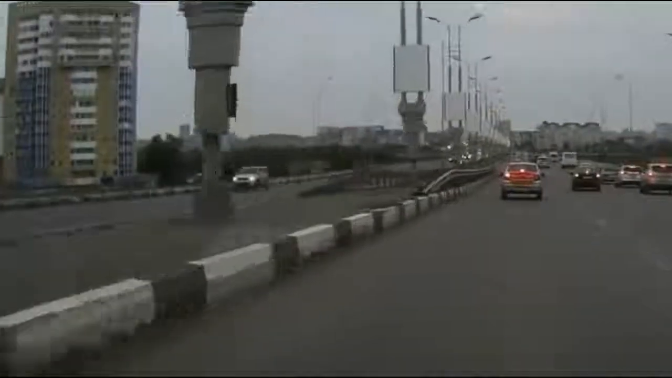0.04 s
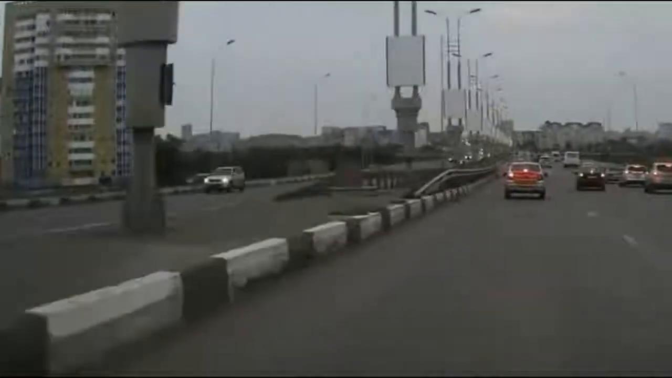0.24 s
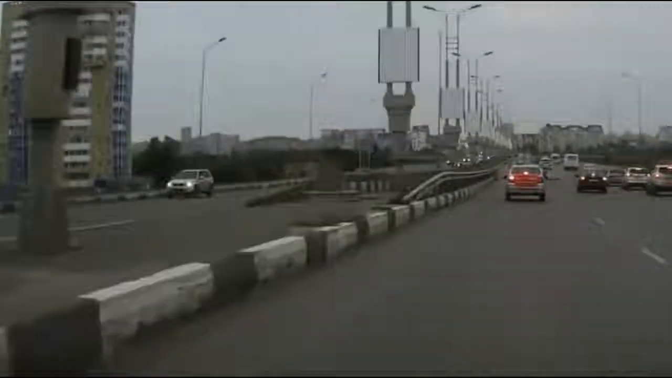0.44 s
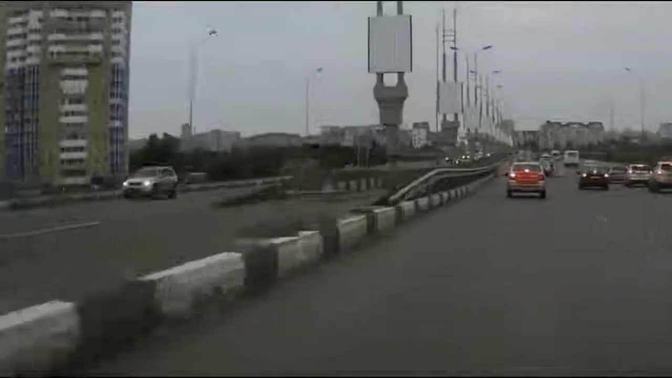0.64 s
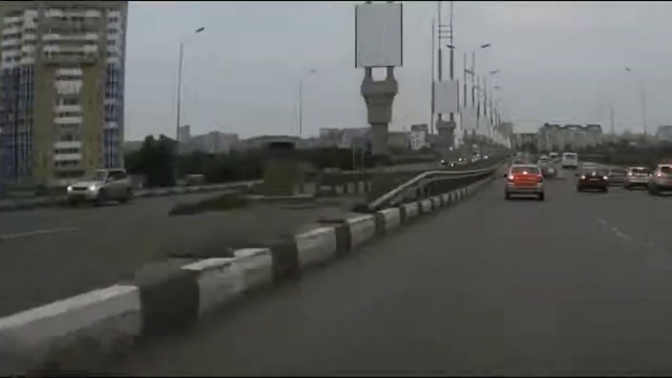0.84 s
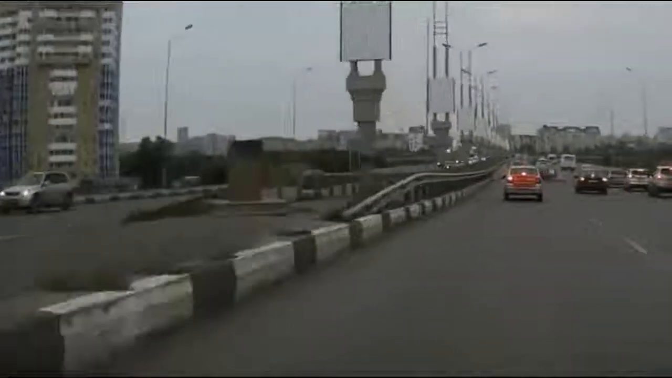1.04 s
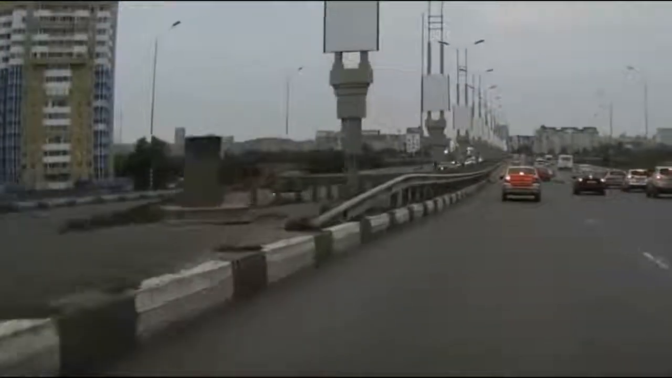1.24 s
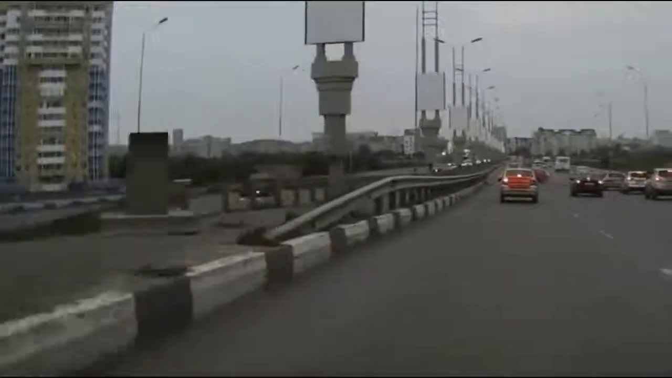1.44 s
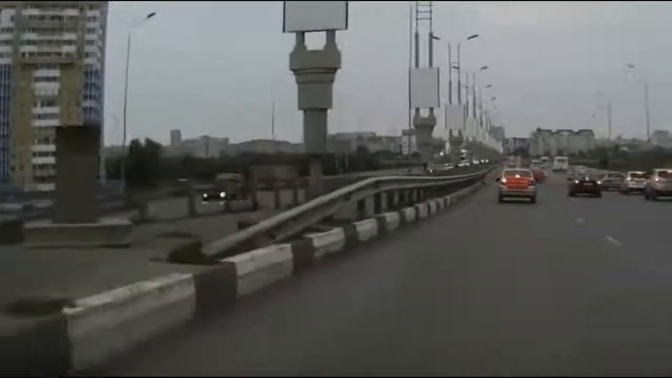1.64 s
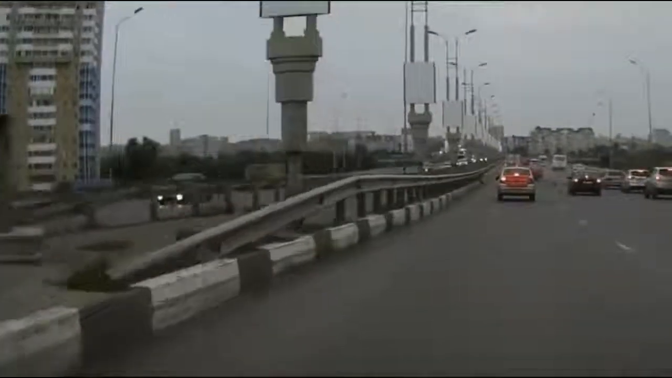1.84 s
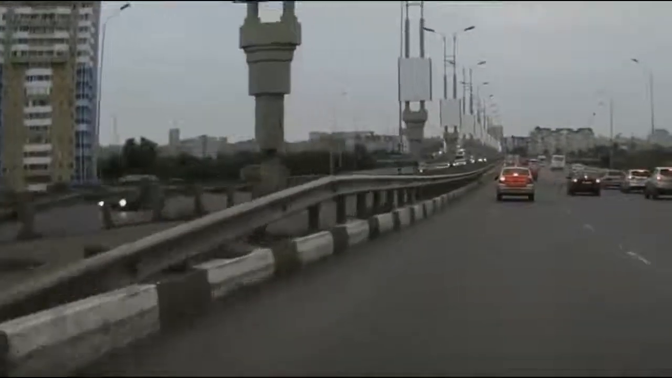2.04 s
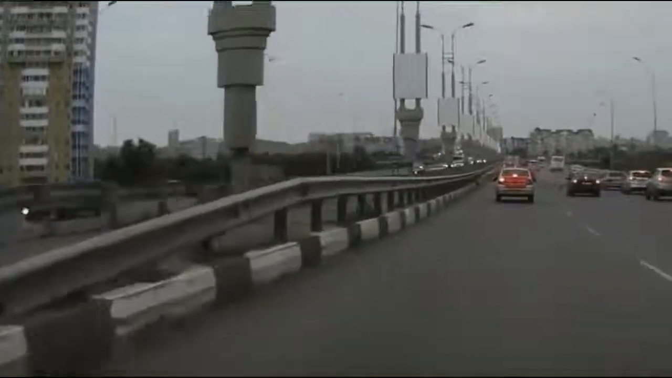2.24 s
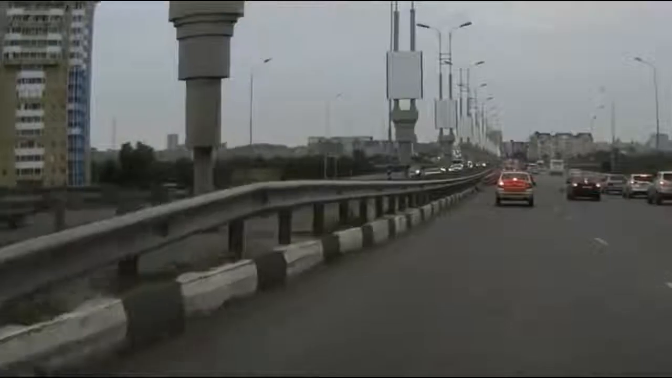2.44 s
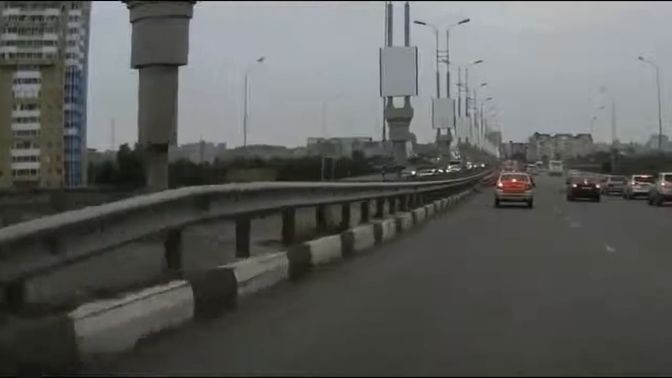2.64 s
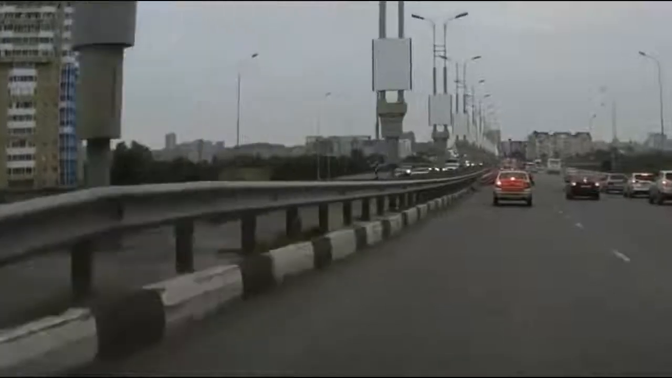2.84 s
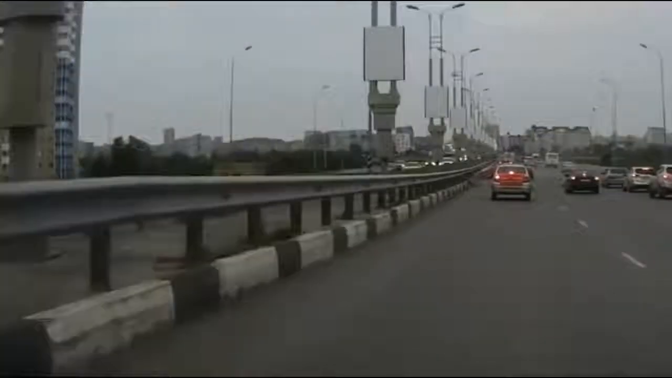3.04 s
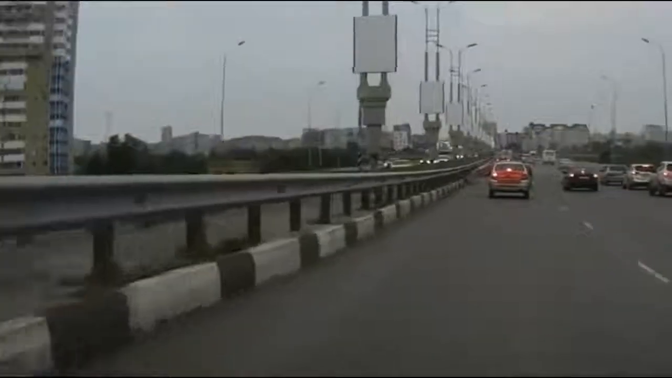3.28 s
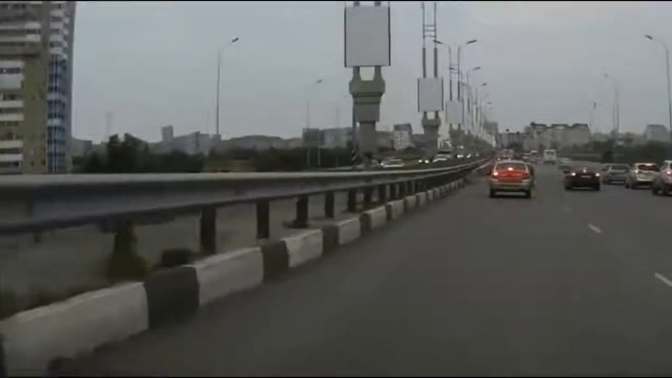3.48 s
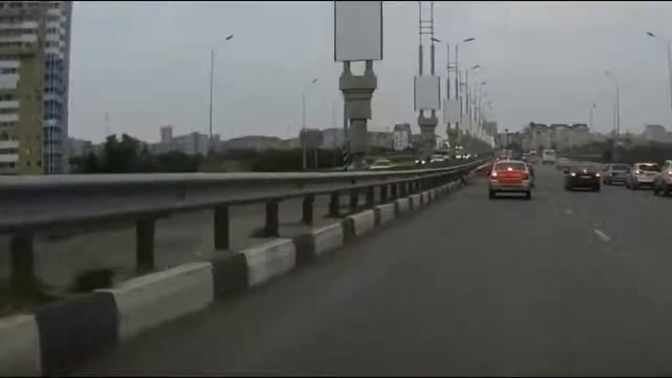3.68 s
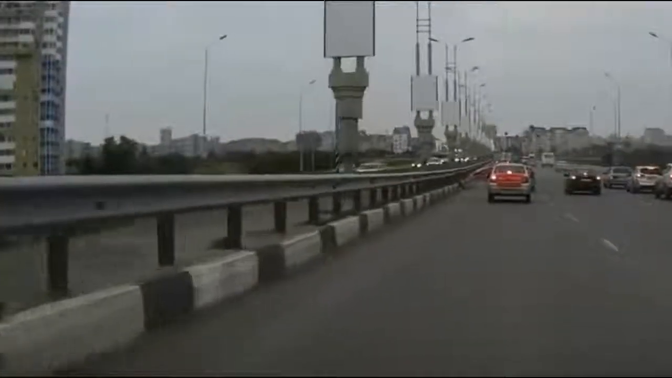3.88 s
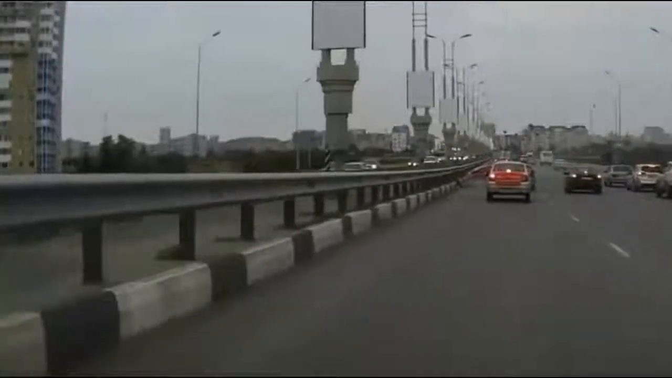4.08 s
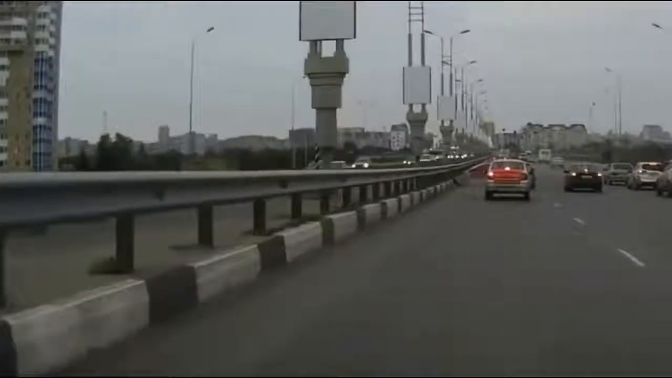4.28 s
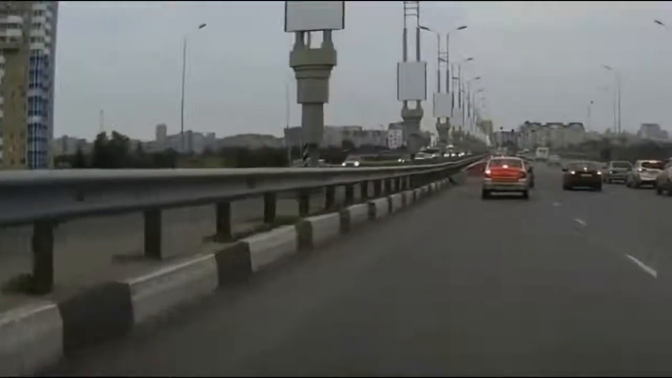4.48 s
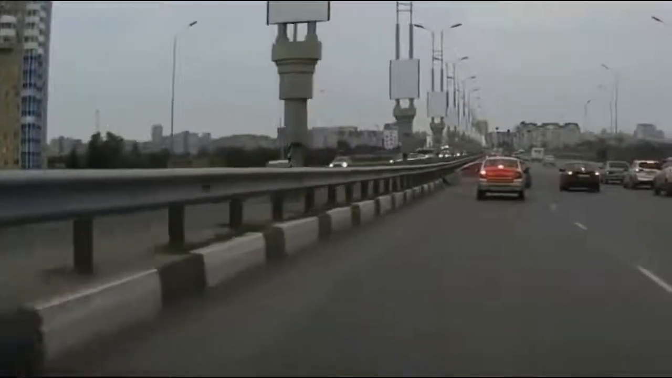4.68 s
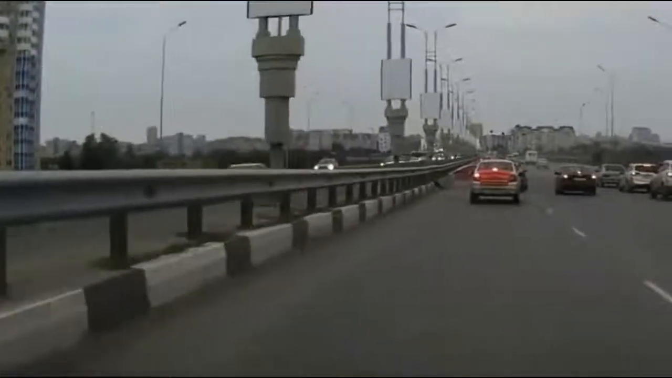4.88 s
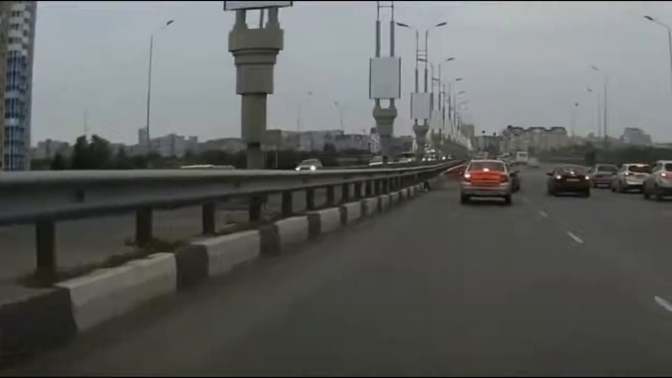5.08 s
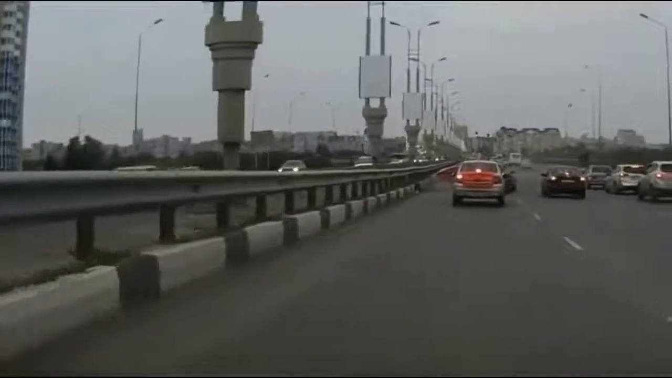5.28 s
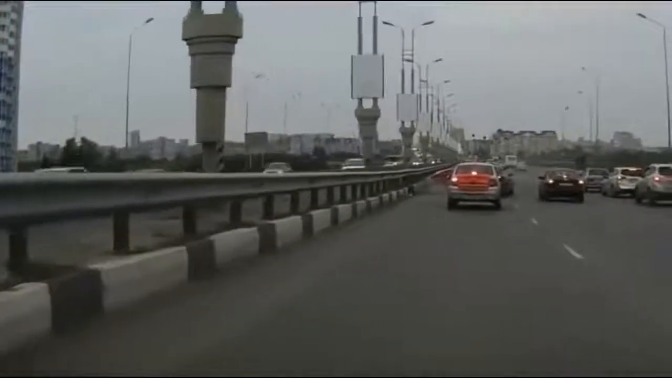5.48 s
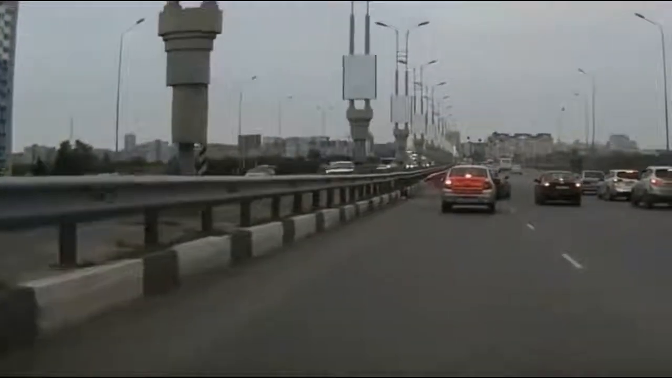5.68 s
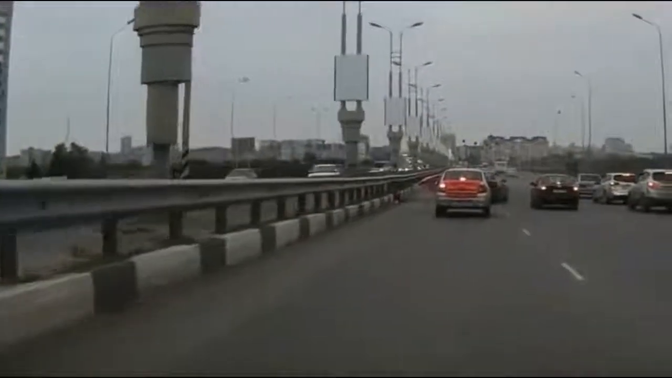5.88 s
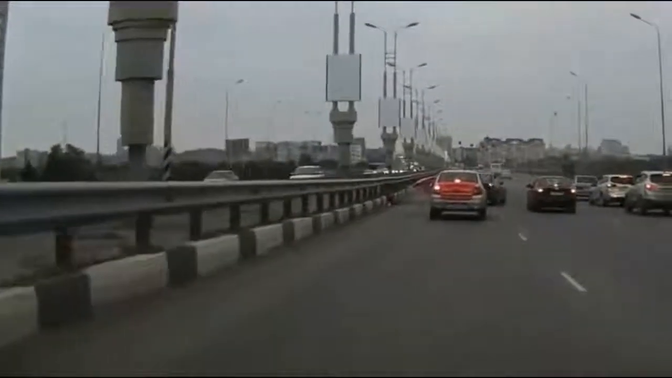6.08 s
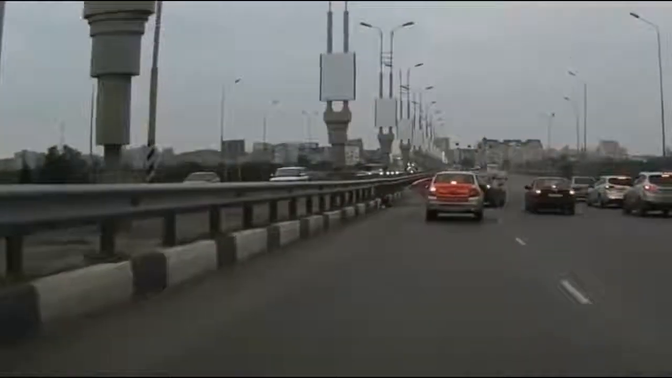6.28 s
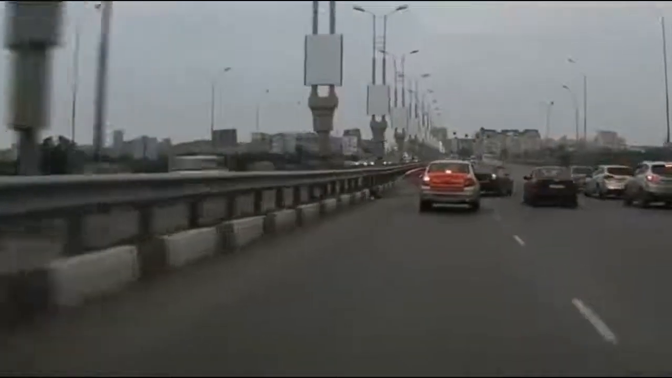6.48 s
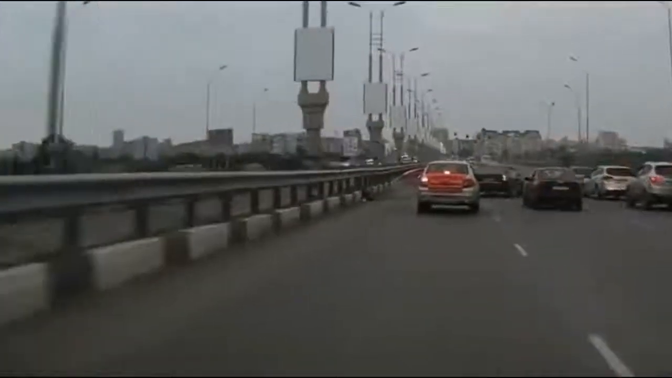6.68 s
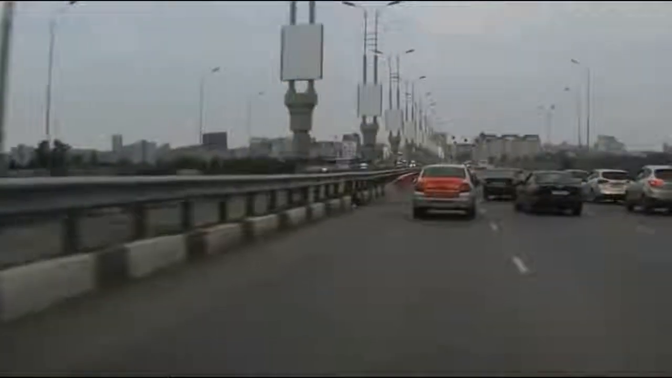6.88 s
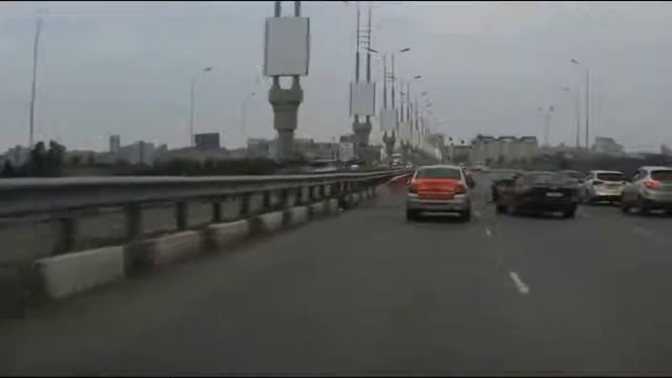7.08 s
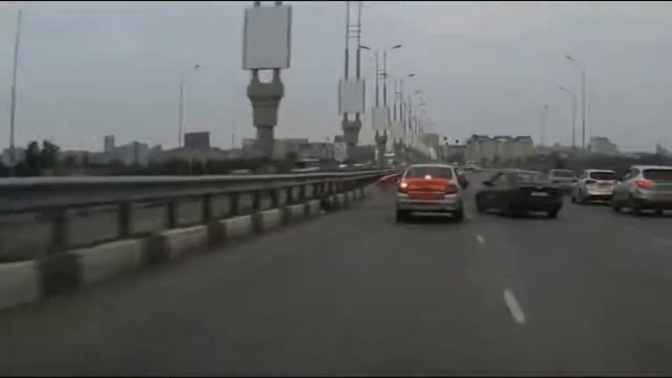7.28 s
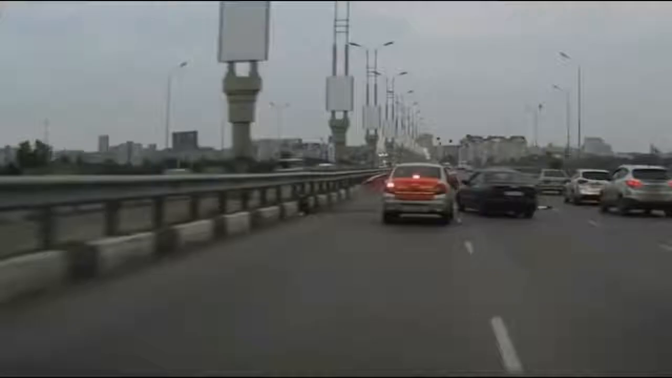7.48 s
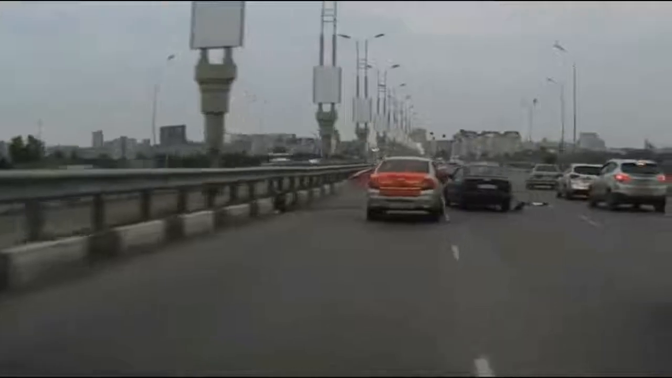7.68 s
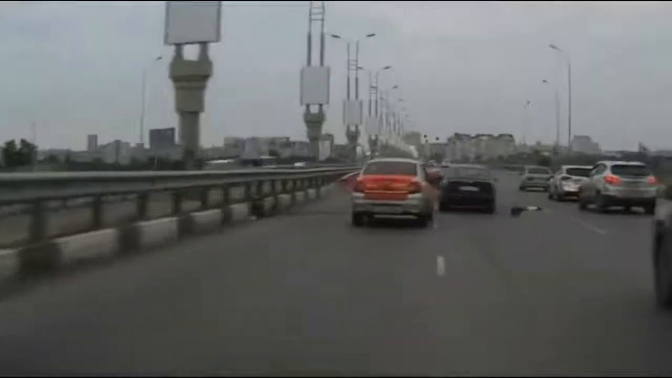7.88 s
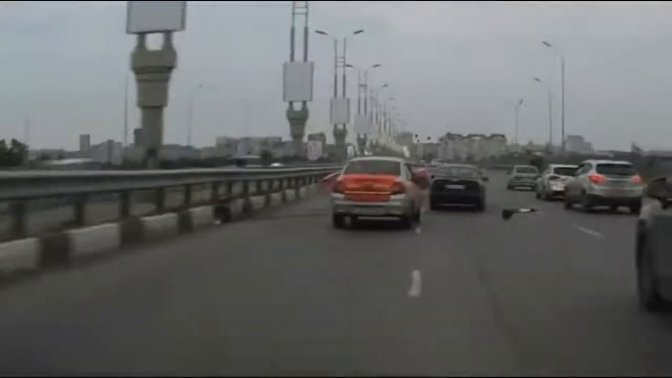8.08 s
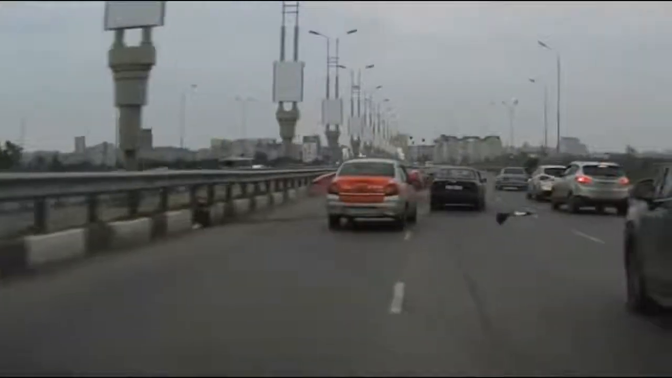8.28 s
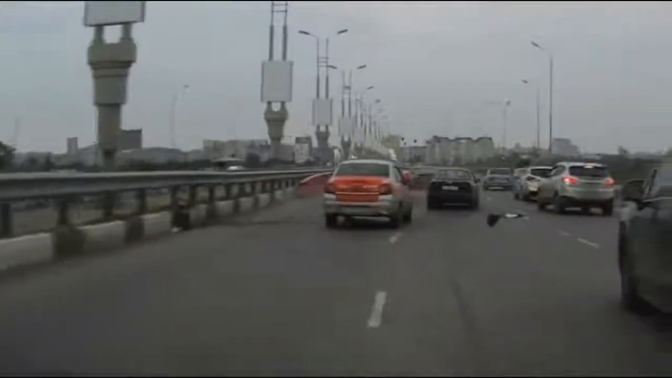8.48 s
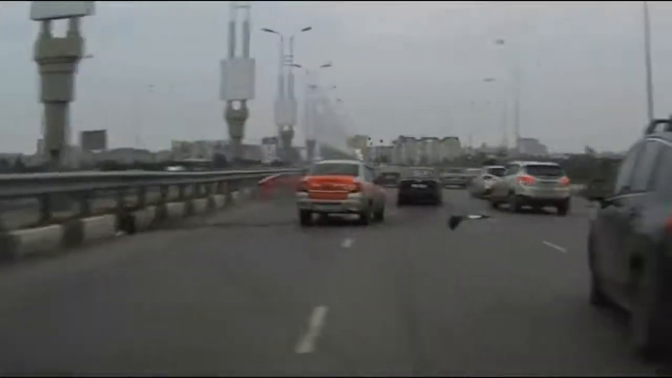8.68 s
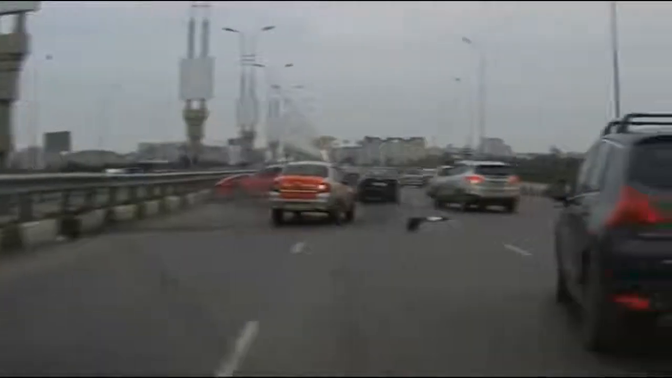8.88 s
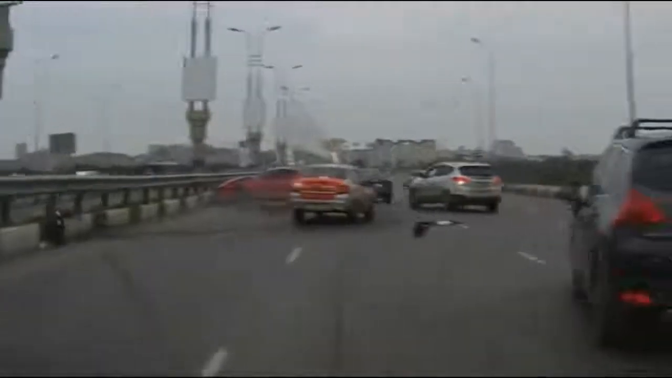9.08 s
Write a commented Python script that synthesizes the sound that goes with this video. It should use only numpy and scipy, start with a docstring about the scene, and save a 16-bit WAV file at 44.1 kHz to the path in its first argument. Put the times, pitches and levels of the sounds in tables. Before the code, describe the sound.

Deep drone, suspension thuds and tyre roar fill a car's cabin, fading as it brakes while loose trim ticks and rattles.

```python
"""Inside a car rolling along a city bridge and slowing in traffic. Air hisses, tyres roar, and nearby
tyres scrub under braking. Rough asphalt shakes the floor and rings the cabin and the air in the tyres,
over the engine's shudder. Stick-slip contacts make loose trim near the microphone buzz, tick and creak.
Loudest is the body's boom, suspension thuds plus a wavering drive-line drone; it overloads the input."""
import sys
import numpy as np
from scipy import signal
from scipy.fft import rfft, irfft, next_fast_len
from scipy.io import wavfile
from scipy.ndimage import uniform_filter1d

SR = 44100
rng = np.random.default_rng(int(sys.argv[2]) if len(sys.argv) > 2 else 0)


def master_out(mix):
    """Clip the mix to full scale and print it as 16-bit PCM to the path in sys.argv[1]."""
    frames = np.transpose(np.atleast_2d(mix))
    ceiling = np.clip(frames, -1, 1)
    pcm = np.round(ceiling * 32767).astype(np.int16)
    wavfile.write(sys.argv[1], SR, pcm)


N = 402191


def from_db(db):
    return 10 ** (np.asarray(db) / 20)


def unit_rms(x):
    return x / np.sqrt(np.mean(x ** 2) + 1e-20)


def curves(segments):
    """Joins segments of (t/s, values...) rows; each value column at every sample."""
    times, *columns = np.concatenate(segments).T
    return [np.interp(np.arange(N) / SR, times, column) for column in columns]


def drift(rate_hz):
    """Slow random wander: noise at every 40th sample, two-pole low-pass; rms 1."""
    pole = np.exp(-80 * np.pi * rate_hz / SR)
    slow = signal.lfilter([1], [1, -2 * pole, pole * pole], rng.standard_normal(N // 40 + 2002))[2000:]
    return np.interp(np.arange(N) / 40, np.arange(len(slow)), unit_rms(slow))


def colour(x, spectrum):
    """Filters x by (f/Hz, level/dB) points; rms 1."""
    hz, db = np.transpose(spectrum)
    size = next_fast_len(N)
    log_hz = np.log(np.arange(1, size // 2 + 2) * SR / size)
    gain = from_db(np.interp(log_hz, np.log(hz), db, -150, -150))
    return unit_rms(irfft(rfft(x, size) * gain, size)[:N])


def noise(spectrum):
    return colour(rng.standard_normal(N), spectrum)


def evened(x, span_s):
    """Flattens level changes slower than span_s."""
    size = int(span_s * SR)
    return x / np.sqrt(uniform_filter1d(uniform_filter1d(x * x, size), size) + 0.00085)


def resonate(x, hz, width_hz):
    """Twice through one resonance; rms 1."""
    r = np.exp(-np.pi * width_hz / SR)
    poles = [1, -2 * r * np.cos(2 * np.pi * hz / SR), r * r]
    return unit_rms(signal.lfilter([1, 0, -1], poles, signal.lfilter([1, 0, -1], poles, x)))


def ringing(modes):
    """Noise-driven resonances; rms 1."""
    return unit_rms(sum(from_db(db) * resonate(rng.standard_normal(N), hz, width_hz)
                        for hz, width_hz, db in modes))


def swelling(base_db, swells, column=2, edge_s=0.045):
    """Gain of a base level plus swells: rows of (t/s, length/s, ...), level/dB in the given column."""
    t, power = np.arange(N) / SR, from_db(2 * base_db)
    for start, length, db in np.array(swells)[:, [0, 1, column]]:
        ramp = np.clip(np.minimum(t - start, start + length - t) / edge_s + .5, 0, 1)
        power = power + from_db(2 * db) * ramp ** 2
    return np.sqrt(power)


# input hiss spectrum: f/Hz, level/dB
HISS_SPECTRUM = [(7600, -30), (8300, -3), (8600, 0), (9700, 0), (10000, -10), (10700, -24)]

def input_hiss(level_db=-72.5, step_s=6.278, step_db=-8):
    """Faint high hiss of the input; its level steps down once."""
    db = level_db + step_db * (np.arange(N) > step_s * SR)
    return from_db(db + 0.66 * drift(15.0)) * noise(HISS_SPECTRUM)


# scrub strength: t/s, low note/dB, high note/dB
SCRUB_LEVELS = [
    [(5.75, -67, -80), (5.95, -58, -56), (6.15, -60, -55), (6.27, -52, -56), (6.29, -53, -65),
     (6.42, -55, -62), (6.55, -60, -86.5), (6.85, -55, -69), (7.0, -60, -71), (7.2, -63, -72.5),
     (7.4, -74, -80), (8.28, -70, -73), (8.38, -55, -67), (8.49, -54, -67), (8.6, -71, -74)],
]
# scrub notes: f/Hz, width/Hz
SCRUB_BANDS = [(975, 100), (2050, 230)]

def tyre_scrub():
    """Nearby tyres scrub under braking: two noisy notes."""
    return sum(from_db(db + 1.5 * drift(12.0)) * evened(ringing([(*band, 0)]), 0.09)
               for db, band in zip(curves(SCRUB_LEVELS), SCRUB_BANDS))


# rolling noise: t/s, tyre roar/dB, air hiss/dB
ROLLING_LEVELS = [
    [(0.0, -29, -36), (0.8, -30, -41), (2.93, -35, -42.5), (3.46, -32, -42), (4.21, -35.5, -45.5),
     (5.75, -39, -47), (6.1, -37, -46), (6.27, -38.5, -43)],
    [(6.28, -46, -51.5), (6.56, -45.5, -50.5), (7.1, -45, -49), (7.26, -46.5, -52), (7.81, -45, -53),
     (8.3, -48, -51), (8.77, -46, -50), (8.95, -46, -50), (9.12, -45, -50)],
]
# tyre roar and air hiss spectra: f/Hz, level/dB
ROAR_SPECTRUM = [(110, -29), (180, -8.5), (209, -3.5), (252, -7), (297, -8.5), (340, -8.5), (471, -15),
                 (554, -15), (800, -25.5), (1040, -58.5), (1760, -120)]
AIR_SPECTRUM = [(380, -26.5), (650, -2), (683, -3.5), (734, -8.5), (878, -4), (1030, -8), (1150, -7.5),
                (1400, -12.5), (1600, -12.5), (1850, -11), (2360, -16.5), (2570, -18), (3600, -27.5),
                (4680, -64.5), (7920, -120)]

def rolling():
    """Tyre roar and air hiss flicker partly together as the surface changes."""
    roar_db, air_db = curves(ROLLING_LEVELS)
    surface = drift(8.0)
    roar = from_db(roar_db + surface + 0.64 * drift(26.0)) * noise(ROAR_SPECTRUM)
    air = from_db(air_db + 1.12 * surface + 0.41 * drift(43.0)) * noise(AIR_SPECTRUM)
    return roar + air


# shudder spectrum: f/Hz, level/dB
SHUDDER_SPECTRUM = [(30, -11.5), (40, 3), (70, -3), (110, -15.5), (200, -28.5), (260, -40)]

def engine_shudder(level_db=-34):
    """The engine's steady low shaking."""
    return from_db(level_db) * noise(SHUDDER_SPECTRUM)


# floor shake, falling as the car slows: t/s, rumble/dB, base thud/dB
FLOOR_SHAKE = [
    [(0.3, -15.5, -23), (0.73, -16, -14.5), (0.86, -22, -14.5), (1.73, -21, -21), (3.24, -21, -19.5),
     (3.68, -23, -14.5), (4.49, -24, -26), (5.22, -26, -23.5), (5.54, -23.5, -23), (5.92, -30.5, -31),
     (6.1, -26, -16), (6.27, -28, -26)],
    [(6.28, -30.5, -27), (6.78, -42, -30.5), (7.65, -33.5, -27.5), (8.18, -44.5, -33.5), (8.72, -49, -32),
     (9.05, -36, -33)],
]
# rumble spectrum: f/Hz, level/dB
RUMBLE_SPECTRUM = [(36, -25.5), (62, -8.5), (81, -3), (113, -6.5), (156, -17.5), (200, -23), (260, -45.5),
                   (440, -120)]

def road_rumble(rumble_db):
    """Rough asphalt shakes the floor in a broad rumble."""
    return from_db(rumble_db + 2.5 * drift(5.5)) * evened(noise(RUMBLE_SPECTRUM), 0.11)


# rough patches: t/s, length/s, cabin/dB, tyre ring/dB
ROUGH_PATCHES = [(0.032, 0.17, -19, -34), (0.306, 0.19, -24.5, -33), (0.655, 0.097, -24, -48.5),
                 (0.804, 0.14, -19.5, -38), (1.093, 0.22, -24.5, -35), (1.48, 0.14, -21, -33.5),
                 (1.853, 0.44, -19.5, -39), (2.344, 0.41, -25, -38.5), (2.791, 0.036, -30, -40),
                 (2.887, 0.1, -22, -36.5), (3.036, 0.11, -21, -37.5), (3.194, 0.24, -23.5, -37),
                 (3.484, 0.095, -20.5, -30), (3.756, 0.15, -22, -42), (3.968, 0.036, -24.5, -40),
                 (4.054, 0.03, -20, -45), (4.174, 0.41, -23, -40.5), (4.633, 0.1, -25.5, -51),
                 (4.783, 0.12, -24, -40.5), (4.975, 0.082, -26.5, -52), (5.095, 0.034, -28, -45),
                 (5.289, 0.034, -32, -48), (5.405, 0.25, -28, -48), (5.764, 0.06, -31, -47),
                 (5.882, 0.078, -26, -45), (6.033, 0.108, -28, -53), (6.195, 0.034, -31, -45)]
# resonances of the tyre air and the cabin: f/Hz, width/Hz, level/dB
TYRE_MODES = [(212.7, 5.5, -13), (263.8, 10, 0.5), (325, 18, -8)]
CABIN_MODES = [(150.7, 15, 2), (165.1, 14, -2)]
# wavering cabin hum: t/s, f/Hz
HUM_PITCH = [(0.0, 144.8), (0.25, 161.6), (0.78, 138.6), (0.9, 167.1), (0.98, 148.1), (1.1, 166.6),
             (1.41, 138.8), (1.61, 155.6), (1.68, 139.4), (2.32, 155.1), (2.48, 143.8), (2.62, 160.6),
             (2.88, 163.4), (3.13, 144.4), (4.31, 157.1), (4.98, 143.7), (5.14, 169.7), (5.63, 146.6),
             (5.76, 163.7), (6.19, 155.5), (6.23, 142.7), (6.5, 151.8)]

def cavity_ring(rumble_db, hum_db=-3):
    """The road rings the cabin and the air in the tyres, harder on rough patches."""
    cycles = np.cumsum(curves([HUM_PITCH])[0] * (1 + 0.02 * drift(6.0))) / SR
    hum = from_db(hum_db) * np.sqrt(2) * np.sin(2 * np.pi * cycles)
    cabin_gain = swelling(rumble_db - 10.5 + 4.0 * drift(7.0), ROUGH_PATCHES)
    tyre_gain = swelling(rumble_db - 21, ROUGH_PATCHES, column=3)
    return cabin_gain * evened(hum + ringing(CABIN_MODES), 0.14) + tyre_gain * ringing(TYRE_MODES)


# trim modes: f/Hz, level/dB
TRIM_NOTES = [(3435, -3), (3720, -4), (3995, 0), (4085, -2), (4212, -2), (4393, 0), (4600, -3), (4822, 0),
              (5170, -3), (5275, -2), (5498, -3), (5890, 0), (6325, -2), (6800, -6)]

def trim_ring(t, hz, reach_hz=700, spread_db=2.5):
    """Trim modes near hz sound with random strength and phase; rms 1."""
    mode_hz, db = np.transpose(TRIM_NOTES)
    scatter, phase = rng.standard_normal((2, len(mode_hz)))
    gains = from_db(db + spread_db * scatter) * np.exp(-((mode_hz - hz) / reach_hz) ** 2)
    return unit_rms(gains @ np.sin(2 * np.pi * (mode_hz[:, None] * t + phase[:, None])))


# rattling spells: t/s, length/s, tick/dB, rustle/dB
RATTLE_SPELLS = [(0.023, .12, -43, -53), (0.262, .1, -45, -58), (0.448, .28, -53, -58),
                 (1.09, .42, -54, -65.5), (1.729, .1, -50, -51.5), (1.955, .14, -49, -54),
                 (2.401, .05, -40, -53), (3.21, .15, -55, -58.5), (3.894, .07, -44, -59),
                 (4.69, .065, -56, -56), (5.082, .2, -55, -59.5)]

def rattle_ticks(gap_s=.048, spread_db=2.2):
    """Uneven runs of small creaks, scattered in strength and pitch; rows as in TRIM_CREAKS."""
    rows = []
    for start, length, db, _ in RATTLE_SPELLS:
        for i, (late, loud, high, mid) in enumerate(rng.standard_normal((16, 4))):
            onset = start + gap_s * (i + .25 * abs(late))
            ring_hz, hollow_hz = 3900 * (1 + 0.19 * abs(high)), 1650 * (1 + 0.14 * mid)
            if onset < start + length:
                rows.append((onset, db + spread_db * loud, ring_hz, .4, -2, hollow_hz, 5))
    return rows


# contact noise spectra, treble, middle and low: f/Hz, level/dB
TREBLE_SPECTRUM = [(2300, -35), (2900, -13), (3600, -8), (4200, -6), (4900, -6), (6100, -9), (7400, -18),
                   (7950, -36), (8500, -22), (9500, -23), (10100, -30), (10800, -44)]
MIDDLE_SPECTRUM = [(900, -19.5), (1300, -9.5), (1890, -2.5), (2500, -2), (3200, -7), (4000, -28.5)]
THUMP_SPECTRUM = [(170, -25), (260, -3), (340, 0), (520, -1), (680, -3), (900, -10), (1200, -25)]
# trim buzz: t/s, level/dB
BUZZ_LEVELS = [
    [(0.0, -57), (0.86, -60), (3.54, -57.5), (3.7, -60), (6.15, -62), (6.27, -60)],
    [(6.28, -66.5), (6.62, -68), (7.1, -65.5), (7.24, -67), (8.21, -67), (9.12, -65.5)],
]
# creaks: t/s, level/dB, ring/Hz, ring share/0-1, hollow/dB re level, hollow/Hz, thump/dB re level
TRIM_CREAKS = [(0.4567, -41, 3600, .3, -2, 1700, -5), (0.4966, -39, 4000, .3, -2, 1700, -5),
               (0.5432, -38, 4000, .3, -2, 1700, -5), (0.5814, -40, 4000, .3, -2, 1700, -5),
               (0.5944, -40, 4200, .3, -2, 1700, -5), (0.6533, -43, 4000, .3, -2, 1700, -5),
               (1.095, -42, 4500, .3, -4, 1600, 0), (1.1864, -35, 3400, .4, -2, 1465, 14),
               (1.2526, -35, 4460, .3, -3, 1510, 9), (1.268, -39, 4400, .4, -4, 1600, 0),
               (1.3162, -39, 4200, .3, -2, 2200, 0), (1.3686, -44, 3900, .5, -4, 1600, 0),
               (1.485, -45, 4600, .4, -4, 1600, 0), (1.753, -27, 5100, .6, -12, 1900, -8),
               (1.785, -42, 5100, .6, -12, 1600, -4), (1.803, -38, 5500, .4, -8, 1600, -4),
               (1.9668, -41, 4400, .4, -4, 1600, 0), (2.4486, -24, 3900, .85, -12, 1494, 4),
               (2.467, -29, 4040, .7, -7, 1510, 11), (2.4947, -29, 4827, .6, -14, 1440, 13),
               (2.5127, -8, 4400, .75, -20, 1440, -12), (2.522, -11, 4400, .7, -17, 1980, -8),
               (2.5324, -28, 3730, .5, -2, 2480, 12), (2.662, -48, 4000, .3, 3, 1000, 28),
               (2.7245, -24, 4350, .9, -17, 2100, -4), (2.75, -17, 5100, .6, -24, 2760, 0),
               (2.7595, -8.5, 6000, .65, -15, 1399, -5), (2.765, -30, 5600, .2, 2, 1500, 12),
               (2.7994, -39, 4040, .5, 1.5, 1430, 10), (3.222, -39, 3600, .3, -6, 1600, 0),
               (3.267, -36, 4400, .6, -2, 1580, 8), (3.338, -38, 4600, .5, -6, 1600, 0),
               (3.5099, -42, 4095, .4, 2, 1484, 14), (3.5275, -28.5, 5350, .25, 0, 1453, 11),
               (3.654, -45, 4355, .5, 6, 1000, 28), (4.698, -42, 4300, .3, 2, 1100, 6),
               (4.733, -42, 4200, .3, 0, 2100, 4), (4.823, -52, 4000, .3, 4, 1500, 25),
               (4.872, -52, 4000, .3, 5, 1600, 20), (5.171, -48, 4600, .4, 2, 1500, 18),
               (7.562, -34, 5400, .95, -20, 1600, -12), (7.568, -35, 4400, .95, -20, 1600, -12),
               (7.577, -35, 4400, .95, -20, 1600, -12), (7.58, -36, 5450, .95, -20, 1600, -12),
               (8.1527, -26, 5610, .4, -8, 2202, 2), (8.1565, -22, 4574, .5, 0, 1560, 7),
               (8.377, -49, 4150, .3, 0, 1660, 0), (8.423, -38, 5360, .4, -7, 2570, -17),
               (8.4378, -21, 3950, .3, -6, 2550, -21), (8.8523, -28, 4400, .6, -1, 1900, -8),
               (8.8608, -17, 4400, .65, -10, 1900, -1), (8.8706, -32, 4500, .6, 4, 1900, 4)]

def loose_trim(contacts_per_s=9000.0, spread_db=0.88, crest_db=7, attack_s=.003):
    """Tiny stick-slip contacts buzz the trim; creaks ring its modes and the hollow behind it."""
    sizes = from_db(spread_db * np.minimum(rng.exponential(1, N), 4)) * rng.choice([-1, 1], N)
    contacts = sizes * (rng.random(N) < contacts_per_s / SR)
    treble = colour(contacts, TREBLE_SPECTRUM)
    middle = colour(contacts, MIDDLE_SPECTRUM)
    thump = colour(contacts, THUMP_SPECTRUM)
    out = swelling(curves(BUZZ_LEVELS)[0], RATTLE_SPELLS, column=3) * from_db(drift(15.0)) * treble
    for start, db, ring_hz, share, hollow_db, hollow_hz, thump_db in TRIM_CREAKS + rattle_ticks():
        span = slice(int(start * SR), min(int(start * SR) + SR // 10, N))
        t = np.arange(span.stop - span.start) / SR
        ring = trim_ring(t, ring_hz) + from_db(-2.5) * resonate(treble[span], ring_hz, width_hz=1000)
        bright = np.sqrt(1 - share) * treble[span] + np.sqrt(share) * unit_rms(ring)
        hollow = 1.3 * middle[span] + 0.9 * resonate(middle[span], hollow_hz, width_hz=310)
        hollow += 2.2 * share * np.sin(2 * np.pi * hollow_hz * t)
        t60_s = np.clip(.062 - .0011 * (db + 40), .02, .2)   # harder creaks die faster
        envelope = (1 - np.exp(-t / attack_s)) * from_db(db - crest_db - 60 * t / t60_s)
        out[span] += envelope * (bright + from_db(hollow_db) * hollow + from_db(thump_db) * thump[span])
    return out


# suspension jolts: t/s, length/s, level/dB
SUSPENSION_JOLTS = [(0.083, 0.07, -8), (0.169, 0.054, -13.5), (0.268, 0.069, -10.5), (0.442, 0.24, -8),
                    (0.733, 0.097, -13.5), (0.887, 0.12, -12.5), (1.118, 0.15, -12), (1.366, 0.039, -16),
                    (1.871, 0.12, -10.5), (2.022, 0.078, -13), (2.136, 0.036, -13), (2.244, 0.072, -16.5),
                    (2.356, 0.058, -11), (2.481, 0.19, -11), (2.713, 0.074, -12), (2.837, 0.048, -13.5),
                    (3.082, 0.05, -13), (3.164, 0.05, -9), (3.347, 0.06, -16), (3.453, 0.038, -19),
                    (3.529, 0.32, -7.5), (3.888, 0.076, -12), (4.044, 0.083, -13), (4.158, 0.098, -13),
                    (4.525, 0.076, -13), (4.812, 0.06, -16), (5.401, 0.034, -14), (5.52, 0.059, -12.5),
                    (5.668, 0.044, -11), (6.099, 0.044, -19), (6.171, 0.035, -13), (6.421, 0.054, -22),
                    (6.972, 0.075, -23), (7.102, 0.07, -22), (7.226, 0.79, -22), (8.391, 0.055, -23.5),
                    (8.732, 0.05, -25), (8.836, 0.144, -22)]
# thud spectrum: f/Hz, level/dB
THUD_SPECTRUM = [(10, -10), (16, -2), (27, 3), (36, 0), (46, -15.5)]

def suspension(base_db):
    """Jolts through the suspension swell a very low noise into thuds."""
    return swelling(base_db + 1.8 * drift(5.0), SUSPENSION_JOLTS) * evened(noise(THUD_SPECTRUM), 0.07)


# drive-line drone: t/s, f/Hz, base level/dB
DRONE_TRACK = [
    [(0.0, 57.3, -14), (0.56, 51.18, -14.5), (1.2, 50.1, -19.5), (1.71, 55.34, -18.5), (2.09, 48.13, -12),
     (2.6, 55.6, -14), (3.16, 51.12, -21.5), (3.3, 55, -17), (3.56, 45.08, -23.5), (3.79, 53.8, -22.5),
     (4.66, 48.88, -24), (5.68, 55, -27), (6.01, 51.42, -21.5), (6.27, 56.2, -20.5)],
    [(6.28, 57.0, -25), (6.73, 54.6, -33), (6.99, 48.9, -29), (7.14, 51.8, -33), (7.59, 46.6, -36.5),
     (7.97, 53.2, -30), (8.72, 52.5, -48), (9.12, 55.4, -35)],
]
# drone surges: t/s, length/s, level/dB
DRONE_SURGES = [(0.014, 0.3, -11.5), (0.345, 0.61, -10.5), (1.072, 0.154, -10.5), (1.251, 0.35, -18.5),
                (1.576, 0.63, -11), (2.295, 0.34, -14.5), (2.744, 0.12, -13.5), (2.953, 0.046, -17),
                (3.061, 0.03, -21), (3.181, 0.2, -12.5), (3.508, 0.055, -12.5), (3.686, 0.25, -11),
                (4.025, 0.12, -13.5), (4.358, 0.15, -12), (4.56, 0.096, -16.5), (4.809, 0.048, -16),
                (4.941, 0.071, -14.5), (5.128, 0.047, -16), (5.278, 0.053, -14.5), (5.673, 0.036, -18.5),
                (6.074, 0.067, -18), (6.298, 0.28, -26.5), (6.691, 0.11, -25.5), (6.848, 0.038, -26),
                (6.948, 0.065, -28.5), (7.112, 0.082, -26.5), (7.303, 0.062, -29), (7.463, 0.083, -24),
                (7.585, 0.052, -24), (7.693, 0.22, -25.5), (7.99, 0.13, -25.5)]
# body ringing spectrum: f/Hz, level/dB
BODY_SPECTRUM = [(30, -22), (38, -8.5), (50, -1), (64, -4.5), (75, -19)]

def drive_line():
    """A wavering, surging drone, blurred by the body's own ringing."""
    hz, base_db = curves(DRONE_TRACK)
    cycles = np.cumsum(hz * (1 + 0.04966 * drift(6.35))) / SR
    drone = np.sqrt(2) * np.sin(2 * np.pi * cycles) + from_db(-0.4) * noise(BODY_SPECTRUM)
    return swelling(base_db + 1.8 * drift(7.5), DRONE_SURGES) * evened(drone, 0.086)


def scene(boom_gain_db=-.8):
    """All sources reach one microphone on the dashboard."""
    rumble_db, thud_db = curves(FLOOR_SHAKE)
    boom = from_db(boom_gain_db) * (drive_line() + suspension(thud_db))
    road = road_rumble(rumble_db) + cavity_ring(rumble_db)
    background = engine_shudder() + rolling() + tyre_scrub() + input_hiss()
    return (boom + road + background + loose_trim())[None]


def record(dry, clip_level=.76, coupling_hz=4.5, stopband_hz=11200):
    """The largest swings clip; the coupling capacitor droops the flat tops; the treble is cut."""
    clipped = np.clip(dry, -clip_level, clip_level)
    coupled = signal.sosfilt(signal.butter(1, coupling_hz, "high", fs=SR, output="sos"), clipped)
    return signal.sosfilt(signal.cheby2(12, 70, stopband_hz, fs=SR, output="sos"), coupled)


dry = scene()
out = record(dry)
master_out(out)
```